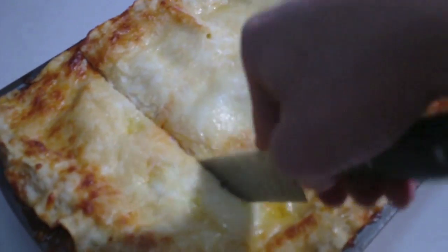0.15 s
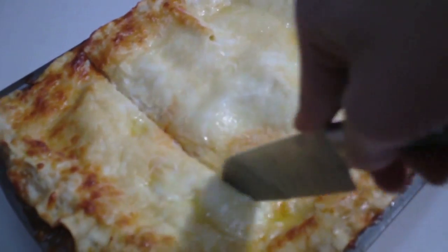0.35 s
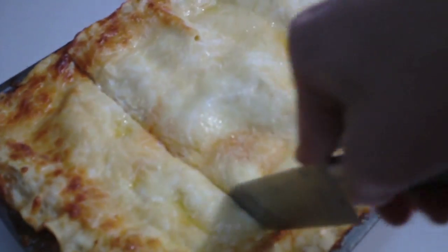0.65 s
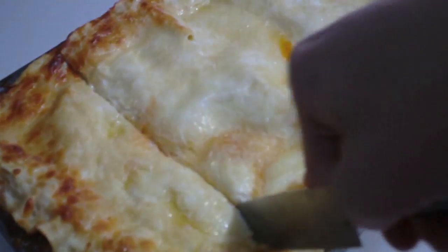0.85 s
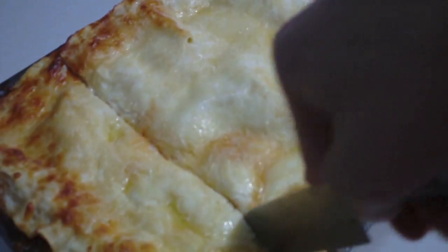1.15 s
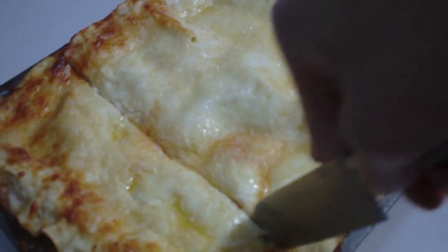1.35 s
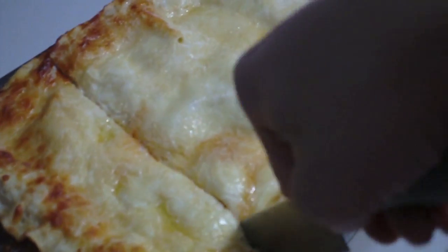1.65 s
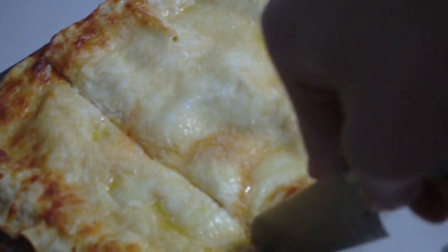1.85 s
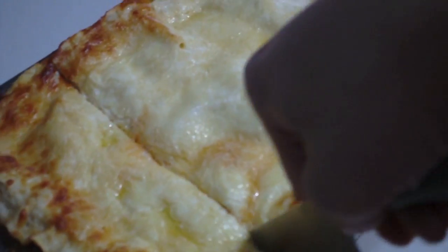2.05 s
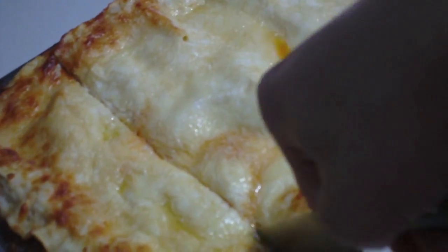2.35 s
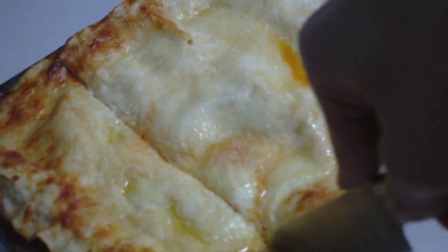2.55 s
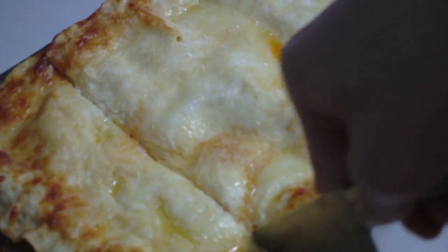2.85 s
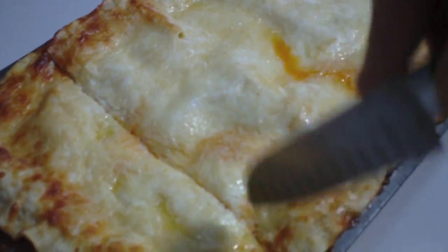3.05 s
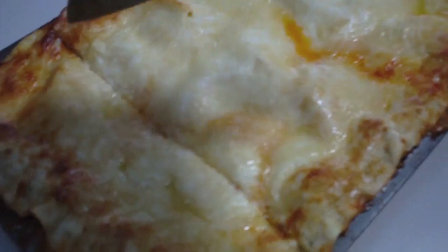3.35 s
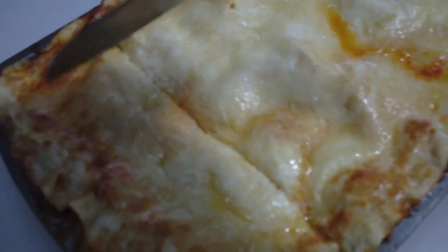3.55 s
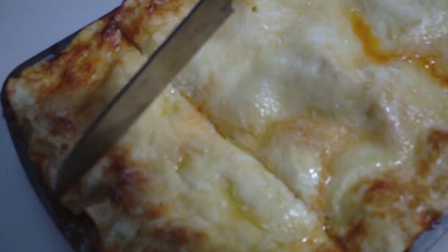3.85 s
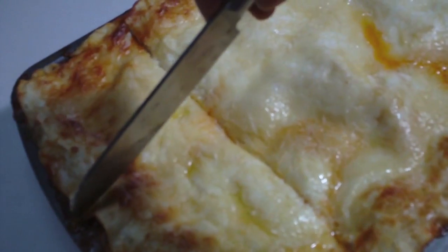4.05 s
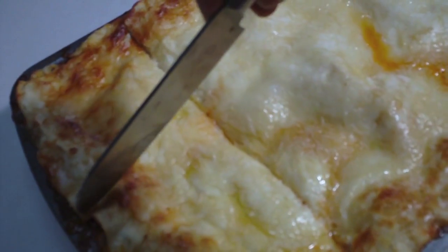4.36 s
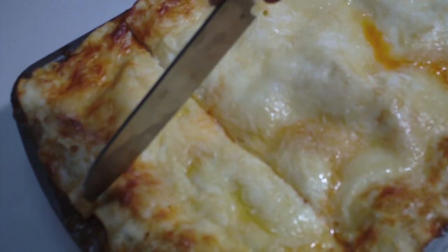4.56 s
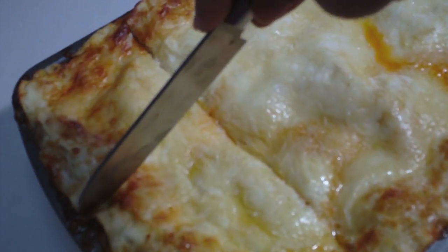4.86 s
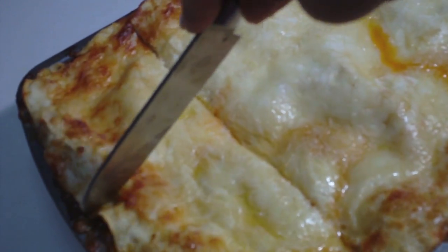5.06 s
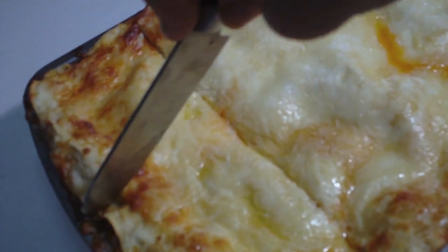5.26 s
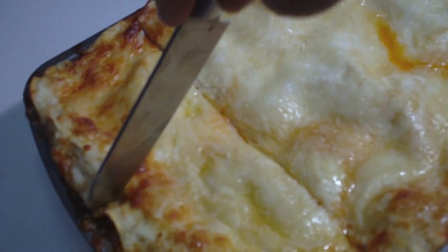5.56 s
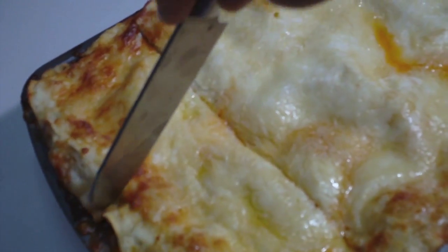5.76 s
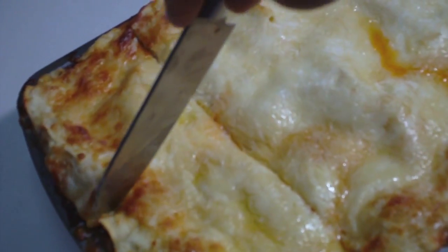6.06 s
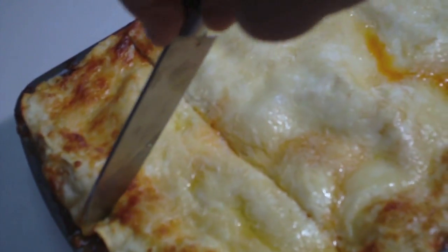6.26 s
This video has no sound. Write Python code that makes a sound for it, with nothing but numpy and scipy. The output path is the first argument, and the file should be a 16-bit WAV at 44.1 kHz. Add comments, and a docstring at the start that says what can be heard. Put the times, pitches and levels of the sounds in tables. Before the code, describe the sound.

A low, wavering appliance hum sits far off under slight hiss. At 0.2 s a knife knocks on a metal pan, bright and short; a harder knock with a dull thump lands at 0.57 s. Fine crust ticks crackle around them, and soft sleeve rustles swell near 0.9-1.5 s. Brighter crust snaps come at 1.6 s, a crisp knock at 2.05 s, and a faint cluster of taps at 2.4 s. Cloth swishes at 2.7 s, then a soft thump and sharp click at 2.8 s. From 3.0 to 3.5 s the sleeve rubs loudest, with a faint low table bump at 3.14 s. Gentler strokes follow, with brief rough squeaks and ticks at 4.2 and 4.8 s. A muted double knock comes at 5.65 s, a crust snap at 6.2 s, and light rustling ends it. Close mono microphone, small kitchen with short echoes.

```python
"""A low appliance hum is heard first; within a quarter of a second a knife knocks on a metal pan.
Place: a kitchen table, a baked dish being cut. Distance: pan close, appliance far off. Microphone: one, mono.
Sharp pulses and chatter ring the pan modes; short noise bursts are the crust; ringing noise squeaks in the cheese.
A sleeve swishes with each arm stroke, made of thousands of thread slips; an elbow nudges the table once.
The appliance is shaped noise with wavering tones, and the room answers pan and sleeve with dense echoes."""
import sys
import numpy as np
from scipy import signal
from scipy.fft import rfft, irfft
from scipy.io import wavfile

SR = 44100
rng = np.random.default_rng(int(sys.argv[2]) if len(sys.argv) > 2 else 0)


def undo_db(level):
    """Turn decibels back into plain size, where 20 dB means ten times bigger."""
    steps = np.asarray(level, float) / 20
    return 10 ** steps


def materialize(psi):
    """Save the field psi as 16-bit PCM at rate SR to the path in sys.argv[1].

    A 1-D psi becomes a single channel; in a 2-D psi each row is a channel.
    """
    bounded = np.clip(np.atleast_2d(psi).T, -1, 1)
    quanta = np.round(bounded * 32767).astype(np.int16)
    wavfile.write(sys.argv[1], SR, quanta)


N = 283115  # samples in the scene


def rms_one(x):
    """Scale x to an rms of 1."""
    return x / np.sqrt(np.mean(x ** 2) + 1e-20)


def in_time(rows):
    """Draw straight lines through the rows of a t/s table; one curve per further column."""
    s, *columns = np.transpose(rows)
    return [np.interp(np.arange(N) / SR, s, c) for c in columns]


def coloured(x, spectrum):
    """Shape x by a spectrum drawn on a log-frequency axis; rms 1."""
    hz = np.maximum(np.arange(N // 2 + 1) * SR / N, 1)
    points = np.array(spectrum)
    db = np.interp(np.log(hz), np.log(points[:, 0]), points[:, 1], left=-60, right=-60)
    return rms_one(irfft(rfft(x) * undo_db(db), N))


def drift(rate_hz):
    """Slow chance of spread 1: noise through two equal low-pass poles, one value every 40 samples."""
    r = np.exp(-80 * np.pi * rate_hz / SR)
    noise = rng.standard_normal(N // 40 + 2002)
    slow = signal.lfilter([1], [1, -2 * r, r * r], noise)[2000:]  # the filter has settled
    return np.interp(np.arange(N) / 40, np.arange(len(slow)), rms_one(slow))


def ring(clicks, hz, t60):
    """A unit click sets a decaying sine of starting height 1 ringing (t60 in s)."""
    r, w = undo_db(-60 / (t60 * SR)), 2 * np.pi * hz / SR
    return signal.lfilter([0, np.sin(w)], [1, -2 * r * np.cos(w), r * r], clicks + 1e-18)


# modes of the pan floor, damped by the food: f/Hz, level/dB before each knock's own chance, t60/s
PAN_MODES = [(430, -18, 0.016), (864, -26, 0.017), (1190, -16.5, 0.0062), (1840, -26.5, 0.013),
             (2460, -16.5, 0.0038), (3820, -20, 0.0065), (4800, -29, 0.0068), (5460, -30, 0.0081),
             (7250, -23.5, 0.01), (7900, -21, 0.0068), (9330, -18.5, 0.0026)]
# blade landing on the pan:
# t/s, snap level/dB, snap half-width/ms, thump level/dB, thump f/Hz, chatter level/dB before its band filter
BLADE_KNOCKS = [(0.2208, -18, 0.054, -19.5, 270, -18.5), (0.565, -12, 0.11, -9, 299, -12),
                (2.0497, -17, 0.057, -33, 270, -34), (2.3844, -32.5, 0.14, -27.5, 334, -36),
                (2.403, -39, 0.16, -32.5, 289, -45), (2.4212, -34, 0.14, -35, 387, -50),
                (2.796, -42, 0.24, -23, 360, -47), (2.8241, -13.5, 0.058, -55, 377, -27),
                (5.6362, -29, 0.075, -23.5, 292, -16), (5.6640, -27, 0.15, -25.5, 241, -35)]


def knocks():
    """The edge lands as a sharp pulse with a millisecond of bright chatter; both ring the pan, which thumps."""
    size, lead = 8192, 0.002  # samples per knock; s before contact
    out = np.zeros(N + size)
    t = np.arange(size) / SR - lead
    chatter_band = signal.butter(1, [4500, 10500], "band", fs=SR, output="sos")
    for s, snap_db, snap_ms, thump_db, thump_hz, chatter_db in BLADE_KNOCKS:
        snap = -np.exp(-(1000 * t / snap_ms) ** 2)
        swell = np.where(t < 0, np.exp(t / 0.00063), np.exp(-t / 0.0012))
        chatter = signal.sosfilt(chatter_band, rng.standard_normal(size) * swell)
        edge = undo_db(snap_db) * snap + undo_db(chatter_db) * chatter

        modes = np.zeros(size)
        for hz, db, t60 in PAN_MODES:
            chance_db = rng.normal(0, 2)  # each knock excites the modes a little differently
            modes += undo_db(db + chance_db) * ring(edge, hz, t60)

        push = np.exp(-((t - 0.0002) / 0.0002) ** 2)
        # pan drives table: the swing builds for a cycle
        swing = ring(ring(push, thump_hz, 0.0028), thump_hz, 0.03)
        tail = undo_db(-56) * ring(push, 0.81 * thump_hz, 0.21)  # lower and longer
        thump = swing / np.abs(swing).max() + tail

        at = round((s - lead) * SR)
        out[at:at + size] += edge + modes + undo_db(thump_db) * thump
    return out[:N]


# crust snapping: t/s, level/dB of the click that starts each noise burst
CRUST_TICKS = [(0.1707, -39), (0.338, -42), (0.378, -41.5), (0.558, -33), (0.6515, -35), (0.73, -39),
               (0.821, -48), (1.1613, -36.5), (1.5986, -27.5), (1.621, -28), (1.6414, -32), (1.774, -38),
               (1.899, -41), (2.0404, -30.5), (2.3396, -31), (4.2333, -41), (4.7476, -42), (4.7845, -46.5),
               (5.311, -39), (5.4156, -39), (6.2174, -27.5)]


def crust():
    """Each snap is a bright burst about a millisecond long; fainter ones come at random."""
    faint_db = -57 + 3.5 * np.minimum(rng.exponential(1, N), 3)
    clicks = (rng.random(N) < 40 / SR) * undo_db(faint_db)  # about 40 a second
    clicks[[round(s * SR) for s, db in CRUST_TICKS]] = undo_db(np.array(CRUST_TICKS)[:, 1])
    fading = signal.lfilter([1], [1, -np.exp(-1 / (0.0014 * SR))], clicks + 1e-18)
    bursts = fading * rng.standard_normal(N)
    return signal.sosfilt(signal.butter(2, [4200, 12000], "band", fs=SR, output="sos"), bursts)


# blade squeaking in the cheese: t/s, fade time constant/s, f/Hz, starting level/dB (rms)
CHEESE_SQUEAKS = [(1.723, 0.033, 1820, -55), (4.233, 0.055, 2240, -43), (4.778, .07, 1190, -50)]


def squeaks():
    """Noise rings one resonance, giving short rough tones that start at once and fade."""
    t, out = np.arange(N) / SR, np.zeros(N)
    for s, fade_s, hz, db in CHEESE_SQUEAKS:
        fade = (t > s) * np.exp(-np.maximum(t - s, 0) / fade_s)
        out += undo_db(db) * fade * rms_one(ring(rng.standard_normal(N), hz, 0.13))
    return out


def table_bump():
    """An elbow nudges the table: one soft 77 Hz push that swells for 26 ms and dies away."""
    t = np.arange(N) / SR
    since = np.maximum(t - 3.14, 0) / 0.026
    return undo_db(-40) * since * np.exp(1 - since) * np.sin(2 * np.pi * 77 * t)


# arm strokes that rub the sleeve:
# peak t/s, rise to the peak from 10 dB below/ms, fall by 10 dB/ms, swish level/dB, weave over swish level/dB
ARM_STROKES = [(0.04, 40, 41, -73, 11.5), (0.24, 40, 110, -62.5, 5.5), (0.4, 80, 80, -75, -2),
               (0.599, 33, 88, -49, -1.5), (0.74, 80, 100, -60, 2.5), (0.941, 78, 106, -44, 4),
               (1.23, 62, 92, -42.5, 1.5), (1.31, 70, 112, -41.5, -2.5), (1.47, 90, 93, -49, 0.5),
               (1.58, 64, 70, -51, 5), (1.645, 40, 47, -56, -5), (1.775, 53, 52, -58, -7),
               (1.85, 59, 58, -53, 0), (1.96, 57, 105, -49.5, 1.5), (2.11, 50, 70, -57.5, -2),
               (2.25, 77, 73, -54.5, 4), (2.35, 56, 102, -52, 1), (2.59, 45, 90, -46.5, -2.5),
               (2.685, 43, 120, -38, 1), (2.89, 48, 70, -49, 6.5), (2.97, 51, 100, -38.5, -0.5),
               (3.08, 89, 98, -30, -1.5), (3.21, 85, 154, -31.5, -3), (3.339, 68, 57, -30.5, -1.5),
               (3.42, 102, 310, -34.5, -5.5), (3.74, 45, 90, -39, 2), (3.83, 71, 150, -43.5, 4),
               (4.0, 150, 226, -47, 3), (4.249, 40, 102, -41.5, -4.5), (4.38, 90, 100, -50, -5),
               (4.64, 150, 133, -62, 1.5), (4.81, 21, 80, -45.5, -7), (4.865, 50, 100, -46, 8.5),
               (4.96, 90, 144, -43.5, -2), (5.13, 74, 80, -49, -7), (5.3, 150, 129, -62.5, 2),
               (5.43, 28, 130, -55.5, 4.5), (5.62, 130, 113, -48.5, -3.5), (5.799, 54, 90, -49.5, 4.5),
               (5.95, 90, 90, -62, 5), (6.07, 35, 60, -47.5, -1.5), (6.125, 53, 128, -43, -3.5),
               (6.29, 107, 98, -48.5, 1)]
STROKE_ROUNDNESS = 1.29  # power law of the loss in dB: round peaks, tails that end
REST_DB, REST_WEAVE_DB = -71, 7  # cloth between strokes: swish, and weave over swish


def strokes():
    """Each stroke swells to its peak and fades; their powers add. Returns swish and weave levels in dB."""
    t = np.arange(0, N + 64, 64) / SR
    swish, weave = undo_db(2 * REST_DB), undo_db(2 * (REST_DB + REST_WEAVE_DB))
    for s, rise_ms, fall_ms, db, weave_db in ARM_STROKES:
        ms = 1000 * (t - s)
        away = np.where(ms < 0, -ms / rise_ms, ms / fall_ms)
        power = undo_db(2 * (db - 10 * away ** STROKE_ROUNDNESS))
        swish = swish + power
        weave = weave + power * undo_db(2 * weave_db)
    return [np.interp(np.arange(N) / SR, t, 10 * np.log10(p)) for p in (swish, weave)]


def rub(spectrum, spread_db, patchy_db):
    """Threads slip by the thousand, uneven in size, in clumps that come and go."""
    sizes = undo_db(spread_db * np.minimum(rng.exponential(1, N), 4))
    slips = (rng.random(N) < 9000 / SR) * sizes  # about 9000 a second
    return coloured(slips * rng.standard_normal(N), spectrum) * undo_db(patchy_db * drift(14.0))


# colour of the low rasp of the folds: f/Hz, level/dB per Hz
FOLDS_COLOUR = [(350, -10.5), (600, 3), (750, 4.5), (1350, 2.5), (1900, 0.5), (3000, -3.5)]
# colour of the swish: f/Hz, level/dB per Hz
SWISH_COLOUR = [(1000, -9.5), (1700, -7.5), (2400, -5), (3900, -4), (4600, -13.5), (7000, -14)]
# colour of the fine weave: f/Hz, level/dB per Hz
WEAVE_COLOUR = [(3000, 0.5), (4700, 3), (8000, 4), (10000, -3), (12000, -13), (13500, -9), (16000, -12.5)]
# low rasp of the folds when the swish stands at the pivot: t/s, level/dB
FOLD_DRAG = [(0.0, -54), (0.14, -56.5), (0.3, -50.5), (0.48, -55), (0.66, -50), (0.85, -50.5), (1.1, -50.5),
             (1.3, -53), (1.6, -51), (1.72, -56.5), (2.08, -49), (2.3, -55), (2.5, -51.5), (2.64, -50),
             (2.7, -44.5), (2.9, -49.5), (3.0, -39.5), (3.2, -46), (3.66, -46.5), (3.9, -45), (4.2, -50.5),
             (4.28, -56), (4.4, -49), (4.6, -51.5), (4.95, -56), (5.2, -51.5), (5.6, -53), (6.0, -51),
             (6.13, -54.5), (6.42, -51.5)]
DRAG_FOLLOWS, DRAG_PIVOT_DB = 0.47, -49  # share of the swish's swing that the rasp follows; swish pivot


def sleeve():
    """Folds, swish and weave sound together and flutter partly in step."""
    swish_db, weave_db = strokes()
    folds_db = in_time(FOLD_DRAG)[0] + DRAG_FOLLOWS * (swish_db - DRAG_PIVOT_DB)
    cloth = undo_db(swish_db) * rub(SWISH_COLOUR, 0.65, 0.4)
    cloth += undo_db(folds_db) * rub(FOLDS_COLOUR, 2.3, 0.35)
    cloth += undo_db(weave_db) * rub(WEAVE_COLOUR, 0.49, 0.31)
    return undo_db(0.18 * drift(16)) * cloth


def shifting_folds(x, patchy_db):
    """As the cloth changes shape, each third-octave of its sound swells and sinks on its own."""
    out = x.copy()
    edges = 500 * 2 ** np.arange(0, 4.4, 1 / 3)  # Hz
    for low, high in zip(edges, edges[1:]):
        band = signal.sosfilt(signal.butter(1, [low, high], "band", fs=SR, output="sos"), x)
        out += (undo_db(patchy_db * drift(5.9)) - 1) * band
    return out


def kitchen(x):
    """Dense echoes start after 4 ms, build up over a few milliseconds and die, the treble sooner."""
    t60, treble_t60 = 0.31, 0.13  # s
    t = np.arange(SR // 2) / SR
    low = signal.sosfilt(signal.butter(1, 1500, fs=SR, output="sos"), rng.standard_normal(len(t)))
    bright = undo_db(-2.5) * rng.standard_normal(len(t))
    echoes = low * undo_db(-60 * t / t60) + bright * undo_db(-60 * t / treble_t60)
    echoes *= np.clip((t - 0.004) / 0.0023, 0, 1)
    return signal.fftconvolve(x, echoes / np.sqrt(np.sum(echoes ** 2)))[:N]


# loudness of the far appliance, rumble and hum together: t/s, gain level/dB
APPLIANCE_LEVEL = [(0.0, -53), (0.8, -49.5), (1.7, -51.5), (2.04, -49.5), (2.4, -51.5), (3.2, -43.5),
                   (3.7, -46), (5.15, -47), (5.81, -44), (6.42, -46.5)]
# colour of the rumble: f/Hz, level/dB per Hz
RUMBLE_SPECTRUM = [(15, -22), (40, 0), (92, -9.5), (130, -2.5), (174, -6.5), (215, -1.5), (256, -3),
                   (325, -12.5), (410, -7), (479, -17), (600, -19), (900, -19)]
# wavering motor tones: f/Hz, peak level/dB under the same gain, waver spread/dB
HUM_TONES = [(178, -2.5, 2.35), (254.5, -7.5, 2), (330.4, -9, 5.1)]


def appliance():
    """A low rumble with motor tones whose level and phase waver."""
    t = np.arange(N) / SR
    out = coloured(rng.standard_normal(N), RUMBLE_SPECTRUM) * undo_db(-0.5)
    for hz, db, waver_db in HUM_TONES:
        phase = 2 * np.pi * hz * t + 0.22 * waver_db * drift(1.46)
        out += undo_db(db + waver_db * drift(2.74)) * np.sin(phase)
    return undo_db(in_time(APPLIANCE_LEVEL)[0]) * out


def microphone(x):
    """Bass is cut, the housing cancels one treble band, the top ends steeply."""
    notch_hz = 11160
    x = signal.sosfilt(signal.butter(2, 129, "high", fs=SR, output="sos"), x)
    for width_hz in (1880, 350):  # a broad dip with a narrow one at its centre
        x = signal.lfilter(*signal.iirnotch(notch_hz, notch_hz / width_hz, fs=SR), x)
    return signal.sosfilt(signal.ellip(10, 0.5, 27, 15350, fs=SR, output="sos"), x)


def scene():
    """Pan and cloth sound direct and through the room; squeaks, bump and appliance are added dry."""
    pan = knocks() + crust()
    cloth = shifting_folds(sleeve(), patchy_db=2.0)
    wet = kitchen(undo_db(-12.5) * pan + undo_db(-13.5) * cloth)
    mono = pan + cloth + wet + squeaks() + table_bump() + appliance()
    return np.array([mono, mono])


def low_pass(x):
    """Removes everything above the highest recorded frequency."""
    return signal.sosfilt(signal.butter(12, 16480, fs=SR, output="sos"), x)


def record(dry):
    """One hissing microphone feeds both channels, which differ by a faint treble grain that follows the sound."""
    hiss = undo_db(-76) * rng.standard_normal(N)  # level ahead of the microphone's filters
    mono = microphone(dry[0] + hiss)
    treble = signal.sosfilt(signal.butter(1, 7000, "high", fs=SR, output="sos"), mono)
    grain = undo_db(-29.5) * treble * rng.standard_normal(N)
    return low_pass(np.array([mono + grain, mono - grain]))


dry = scene()
out = record(dry)
materialize(out)
```